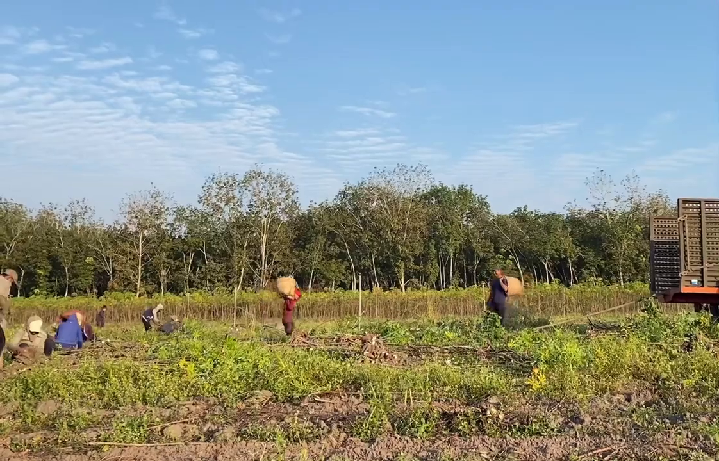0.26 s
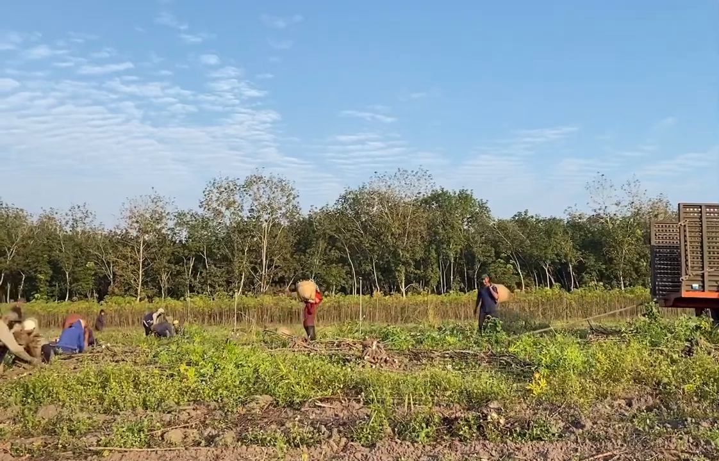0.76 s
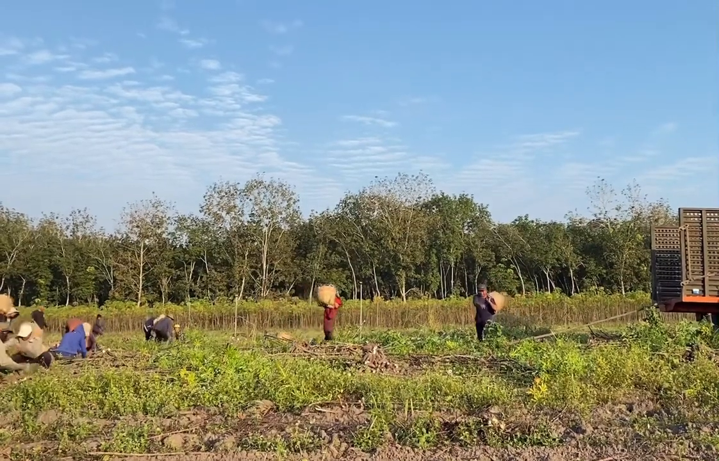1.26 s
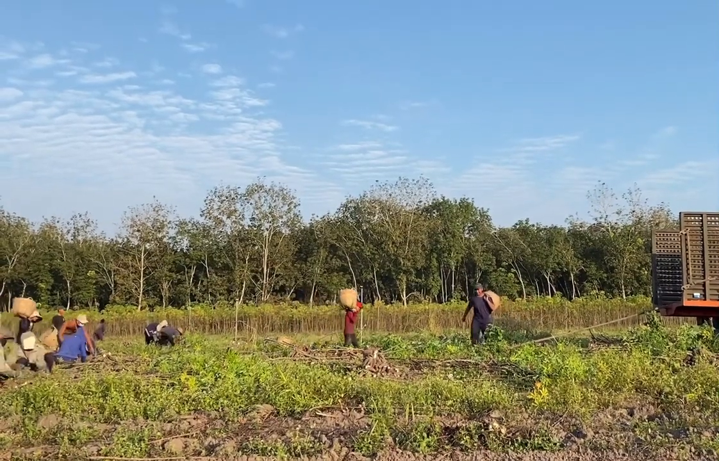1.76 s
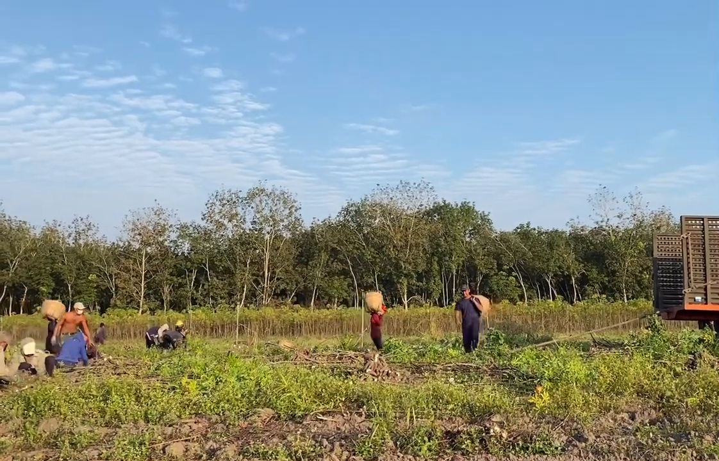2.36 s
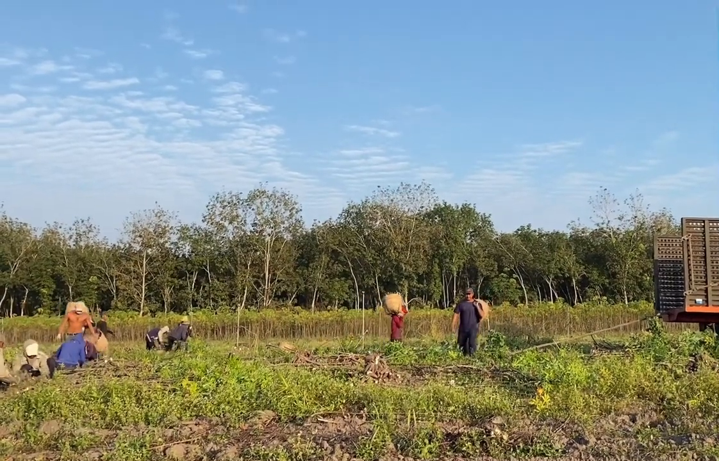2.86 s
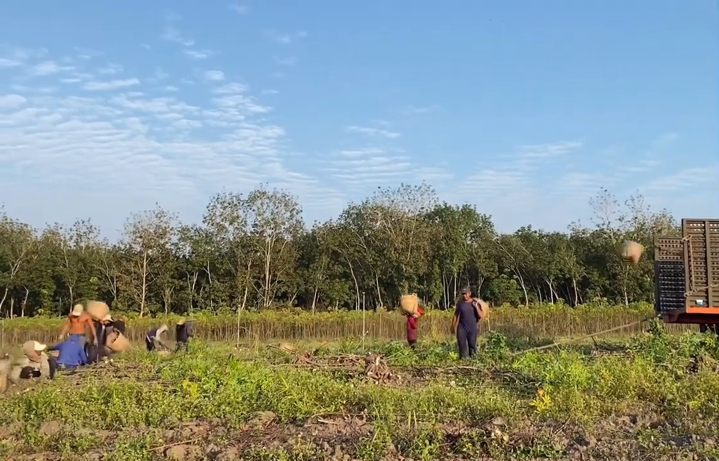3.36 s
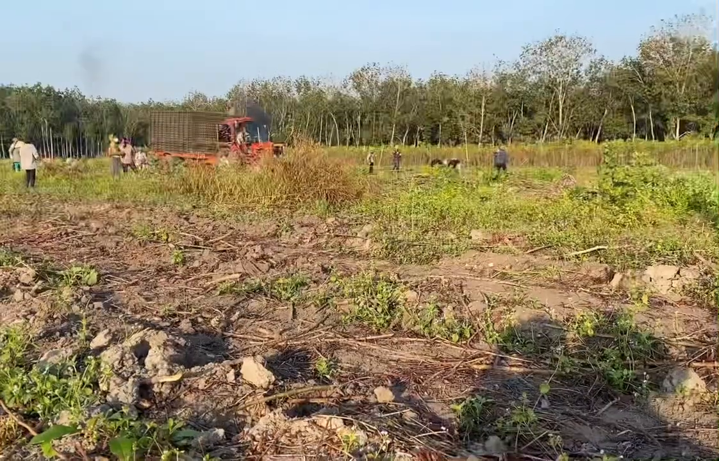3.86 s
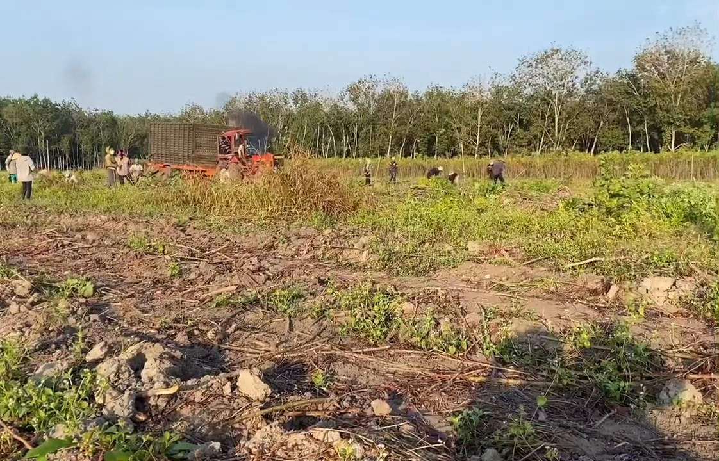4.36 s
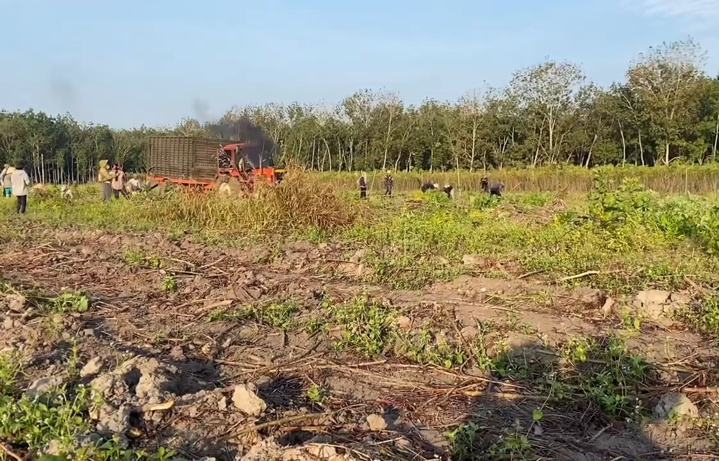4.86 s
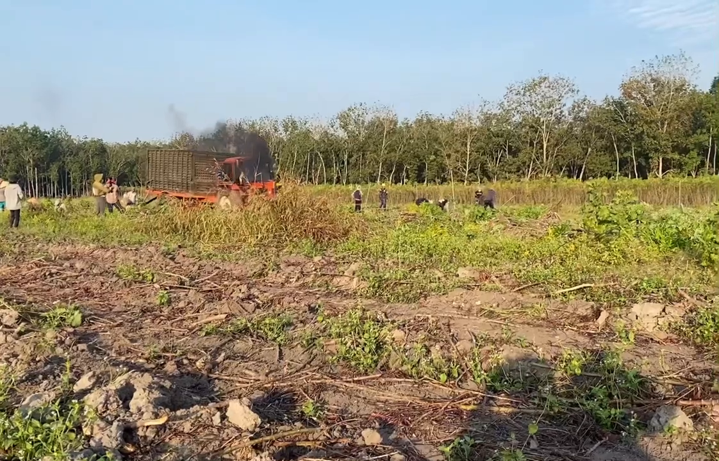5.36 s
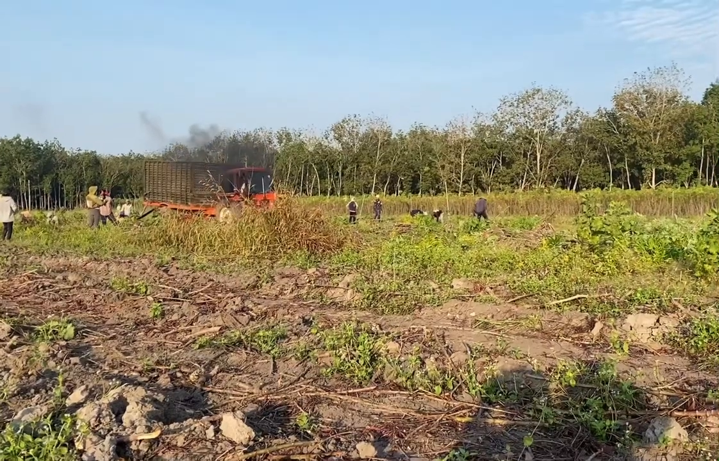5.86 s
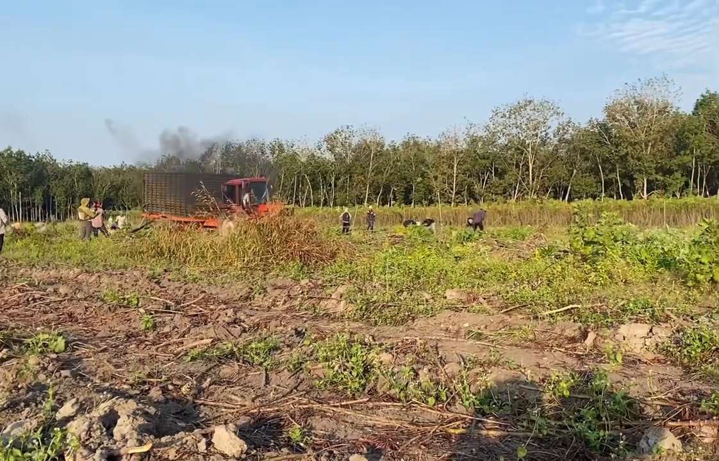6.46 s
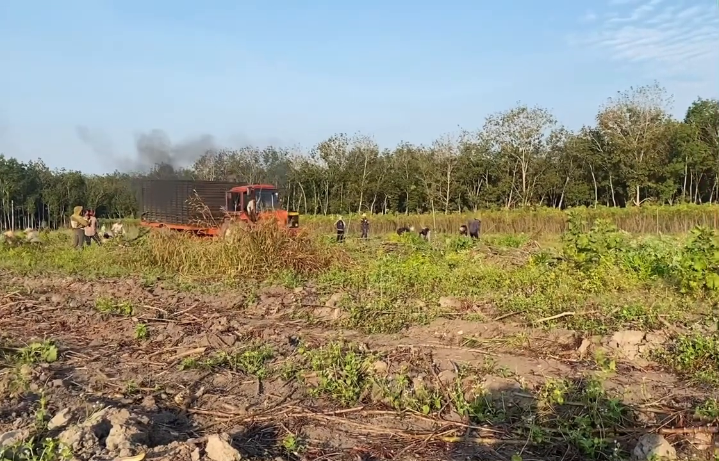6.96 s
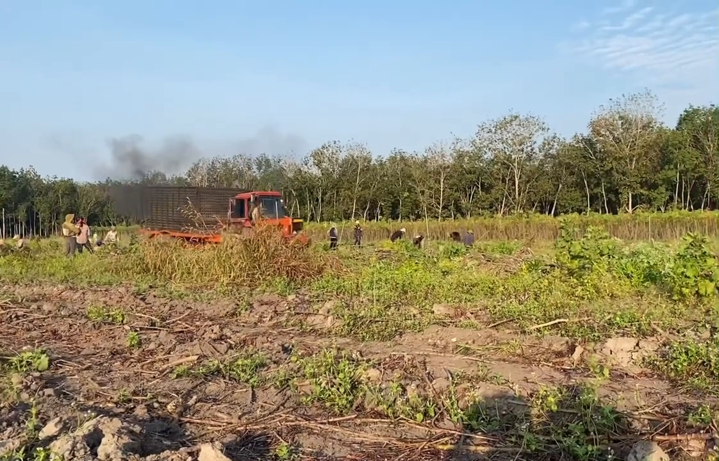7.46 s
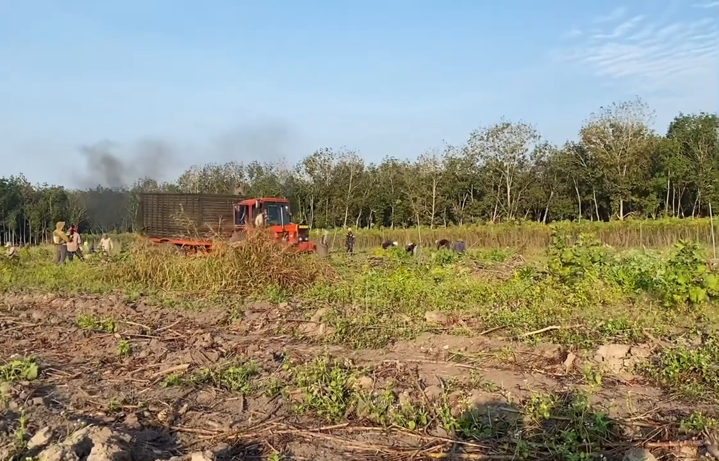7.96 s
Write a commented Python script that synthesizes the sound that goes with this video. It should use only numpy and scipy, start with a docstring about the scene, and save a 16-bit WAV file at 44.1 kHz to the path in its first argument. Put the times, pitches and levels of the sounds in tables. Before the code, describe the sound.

Soft, steady diesel idle in an open field, a brief gap, then slow heavy barks accelerate into a rasping full-load engine roar.

```python
"""A lumpy diesel idle is heard first, with soft clatter and insects, off to one side of a field; after a
short break the same four-cylinder tractor, from another spot, revs up and pulls a loaded trailer.
Impulses at each firing pass through a pipe filter as thumps, and shape noise and decaying rings into the
knock and rasp of the block. A narrow noisy tone is the turbocharger's whistle, climbing as it swells and
then fades. Two microphones hear most layers with a level and phase difference set by frequency."""
import sys
import numpy as np
from scipy import signal
from scipy.fft import rfft, irfft, next_fast_len
from scipy.io import wavfile
from scipy.ndimage import uniform_filter1d

SR = 44100
rng = np.random.default_rng(int(sys.argv[2]) if len(sys.argv) > 2 else 0)


def generate_wav(signal):
    """Clip the signal to [-1, 1] and save it as 16-bit WAV at the path in sys.argv[1]."""
    frames = np.transpose(np.atleast_2d(signal))
    scaled = np.clip(frames, -1, 1) * 32767
    pcm = np.round(scaled).astype(np.int16)
    wavfile.write(sys.argv[1], SR, pcm)


N = 361179
TIME = np.arange(N) / SR  # s
EDGE_HZ = 15500  # upper band limit

# Engine speed under load. Each row: time in seconds, firings per second.
PULL_SPEED = [(3.6, 25.81), (3.92, 26.62), (4.61, 35.35), (5.33, 46.62), (6.1, 62.24), (6.42, 67.72),
              (7.58, 78.64), (8.2, 81.64)]
# Opening of the second spot after the break. Each row: time in seconds, gain.
PULL_FADE = [(3.61, 0.0057), (3.66, 0.41), (3.73, 1)]


def pulling():
    """The engine gathers speed: separate barks merge into a roar while a whistle climbs, swells and fades."""
    rate = curves(PULL_SPEED)[0]
    exhaust_db, knock_db, rasp_db, hiss_db = loudness(rate)
    at, cylinder = firings(rate * (TIME >= PULL_SPEED[0][0]), start_turn=.504)
    speed = (rate - rate.min()) / np.ptp(rate)  # 0 at the slowest, 1 flat out
    _, slow_db, fast_db, _ = np.array(PULL_CYLINDERS)[cylinder].T
    hit_db = slow_db + speed[at] * (fast_db - slow_db)
    engine = pull_exhaust(at, cylinder, rate, speed, exhaust_db)
    engine += at_level(pull_knock(at, cylinder, hit_db, speed), knock_db)
    rasp, puffs = pull_rasp(at, cylinder, hit_db, speed)
    engine += at_level(band(rasp, 1930, 6630), rasp_db)
    engine += at_level(band(rasp, 7070, 16200), hiss_db)
    engine += turbo(puffs) + hum(rate, PULL_HUM)
    engine += ringing(at, hit_db, scatter_db=3.0) + chuffs(at, speed)
    return engine * curves(PULL_FADE)[0]


# Growth of each layer with engine speed. Each holds: level in dB at top speed, dB per octave of speed.
KNOCK_LAW = (-22.5, 7.95)
RASP_LAW = (-33, 7.56)
HISS_LAW = (-44, 3)
# Treble swells and dips. Each row: middle in seconds, half width in seconds (to 1/e), change in dB.
SWELLS = [(4.112, 0.12, 6), (4.72, 0.11, 4), (5.06, 0.15, 7.5), (5.498, 0.088, 2), (5.72, 0.088, 8.5),
          (6.35, 0.071, 8.5), (6.51, 0.24, -7.5), (6.93, 0.14, 5), (8.151, 0.18, 3.5)]
RASP_SWELL_SHARE, KNOCK_SWELL_SHARE = 0.61, 0.23  # how far the lower bands follow
EXHAUST_DB, EXHAUST_DB_PER_OCTAVE, FULL_LOAD_HZ = -16, 13, 42.3  # grows up to this firing rate
BOOM_DB, BOOM_HZ, BOOM_WIDTH_HZ = 4, 58.2, 7.8  # where the beat passes the pipe resonance


def loudness(rate):
    """The exhaust grows to full load and booms at the pipe resonance; knock, rasp and hiss follow speed."""
    exhaust_db = EXHAUST_DB + EXHAUST_DB_PER_OCTAVE * np.minimum(np.log2(rate / FULL_LOAD_HZ), 0)
    exhaust_db += BOOM_DB * bell(rate, BOOM_HZ, BOOM_WIDTH_HZ)
    octaves = np.log2(rate / rate.max())
    knock_db, rasp_db, hiss_db = (db + slope * octaves for db, slope in (KNOCK_LAW, RASP_LAW, HISS_LAW))
    swell_db = sum(db * bell(TIME, s, width) for s, width, db in SWELLS)
    knock_db = knock_db + KNOCK_SWELL_SHARE * swell_db
    rasp_db = rasp_db + RASP_SWELL_SHARE * swell_db
    return exhaust_db, knock_db, rasp_db, hiss_db + swell_db


# The cylinders under load, in firing order. Each row: relative thump in dB, relative knock in dB when
# slow, relative knock in dB flat out, lag in seconds; thump and lag differences are scaled with speed.
PULL_CYLINDERS = [(0.6, 0, 1, .0101), (-0.5, -2.5, -2, .0101), (-1.5, .8, -4.2, .0109),
                  (0.6, 1.3, 1.8, .0106)]
# Exhaust pipe and silencer under load. Each row: frequency in Hz, relative gain in dB.
PULL_PIPE = [(12, -82), (26, -36), (37, -29), (53, -6.5), (71, -1), (80, 2), (106, 5.5), (128, -1),
             (142, -2), (159, -5.5), (180, -14), (205, -12.5), (240, -19), (310, -24.5), (450, -21),
             (900, -46.5)]
SLOW_BASS = 1.4  # extra gain of the deepest part of the puffs at the slowest speed
CRANK_DB = -45  # rms of the crank throb at top speed


def pull_exhaust(at, cylinder, rate, speed, db):
    """One puff a firing through the pipe, over a throb at each turn of the crank (every second firing)."""
    thump_db, _, _, lag_s = np.array(PULL_CYLINDERS)[cylinder].T
    uneven = 0.18 + 0.72 * speed[at] ** 3  # the cylinders differ more at speed
    stumble_db = 2.1 * (1 - speed[at]) ** 3 * rng.standard_normal(len(at))  # the slow engine is unsteady
    lag_s = lag_s.mean() + uneven * (lag_s - lag_s.mean())
    strength_db = uneven * thump_db + stumble_db
    thumps = blows(at, strength_db, scatter_db=0.5, jitter_s=0.000099, delay_s=lag_s)
    pipe = colour(blowdown(thumps, rate, open_share=0.25, longest_s=.0075), PULL_PIPE)
    pipe += SLOW_BASS * (1 - speed) ** 4 * band(pipe, lo_hz=35, hi_hz=80.4)
    crank = np.sqrt(2) * np.sin(np.pi * np.cumsum(rate) / SR)
    throb = gain_of(CRANK_DB) * speed ** 2 * crank
    return at_level(microphones(pipe, [(50, -1.1, 0.14), (200, -0.8, 0.1)]), db) + throb


def blowdown(train, rate, open_share, longest_s):
    """The exhaust valve stays open for a share of each firing, up to a limit: slow puffs are long and deep."""
    out = np.zeros(N)
    for i in np.flatnonzero(train):
        puff = np.hanning(min(open_share / rate[i], longest_s) * SR)
        add(out, (i - len(puff) / 2) / SR, train[i] * puff / puff.sum())
    return out


# Left and right microphones at the second spot. Each row: frequency in Hz, left minus right in dB,
# left lead in radians.
PULL_MICS = [(200, -5, 0.11), (600, 2, 0.23), (1050, 5, 0.33), (1470, 2, 2.25), (1740, 33.5, 2.4),
             (2048, 0.3, 2.45), (2603, 9.5, 7.2), (2740, -0.5, 10.7), (3420, 5, 13.57), (3450, -4.5, 13.56),
             (4310, 5.5, 14.97), (4260, 2, 15.5), (4500, 18, 17), (5900, 3.5, 18.36), (7840, 0, 17.29),
             (10720, 0, 11.26), (14700, 0.2, 5.8)]
GROWL = 0.59  # gain of the bare firing pulses at full speed
BRIGHTEN = 0.81  # extra gain of the top of the knock at full speed


def pull_knock(at, cylinder, hit_db, speed):
    """Each firing knocks on the block, then a piston slaps; slow knocks waver, fast ones growl and brighten."""
    force_db = hit_db * (.8 + .2 * speed[at])
    force_db = force_db + 1.8 * (1 - speed[at]) ** 2 * rng.uniform(-1, 1, len(at))
    hits = blows(at, force_db, scatter_db=.8, jitter_s=.00012, delay_s=.0002)
    slaps = (1 - speed) * blows(at, force_db - 8, scatter_db=2, jitter_s=.0007, delay_s=.0065)
    envelope = bursts(hits + slaps, rise_s=.001, decay_s=.0062)
    knock = evened(rattle(envelope, steady=.25 + .35 * speed ** 2, grain_db=2.9))
    knock += (.65 + .25 * speed) * block_ring(at, cylinder, force_db, rise_s=.0002, decay_s=.0066)
    knock = engine_colour(recolour(knock, at, spread_db=3), speed)
    growl = band(colour(evened(hits), PULL_TONE), 230, 665)
    knock += speed * GROWL * growl - (0.18 + 0.33 * speed) * band(knock, 155, 410)
    knock += BRIGHTEN * speed ** 4 * band(knock, 1440, 2500)
    return band(microphones(knock, PULL_MICS) + trees(knock), 138, 2360)


RASP_BRIGHTEN = 0.4  # extra gain of the middle of the rasp at full speed


def pull_rasp(at, cylinder, hit_db, speed):
    """Ringing treble puffs, each with a weaker second clack, turn into a rush; gives rasp and puffs."""
    clacks = blows(at, hit_db / 2, scatter_db=1.2, jitter_s=.0006, delay_s=-.001)
    clacks += blows(at, hit_db / 2 - 9, scatter_db=2.5, jitter_s=.002, delay_s=.013)
    puffs = uniform_filter1d(bursts(clacks, rise_s=0.008, decay_s=0.0042), size=200)
    rasp = rattle(puffs, steady=0.1 + 3.6 * speed ** 3, grain_db=6)
    rasp += (0.68 + 0.13 * speed) * block_ring(at, cylinder, hit_db / 2, rise_s=0.003, decay_s=0.0094)
    rasp = engine_colour(recolour(rasp, at, spread_db=3.5), speed)
    rasp += RASP_BRIGHTEN * speed ** 6 * band(rasp, 3500, 4300)
    return microphones(rasp, PULL_MICS) + gain_of(-2.5) * trees(rasp), puffs


def block_ring(at, cylinder, hit_db, rise_s, decay_s):
    """Each cylinder rings the block with its own decaying noise, the same at every firing but for strength."""
    t, out = np.arange(SR // 20) / SR, np.zeros(N)
    shape = (1 - np.exp(-t / rise_s)) * np.exp(-t / decay_s)
    for k in range(len(PULL_CYLINDERS)):
        mine = cylinder == k
        own = blows(at[mine], hit_db[mine], scatter_db=1.3, jitter_s=.00007, delay_s=.0002)
        ring = shape * rng.standard_normal(len(t))
        for i in np.flatnonzero(own):
            add(out, i / SR, own[i] * ring)
    return evened(out)


def recolour(x, at, spread_db, count=7):
    """Every firing favours different bands, so no two knocks have the same colour."""
    size = next_fast_len(N)
    log_hz = np.log(np.fft.rfftfreq(size, 1 / SR) + 1)
    place = np.interp(log_hz, np.log(np.geomspace(450, 11000, count)), np.arange(count))
    firing, spectrum = np.searchsorted(at, np.arange(N)), rfft(x, size)
    gains = gain_of(spread_db * rng.uniform(-1, 1, (len(at) + 1, count)))
    out = np.zeros(N)
    for k in range(count):
        slice_k = irfft(spectrum * np.maximum(1 - abs(place - k), 0), size)[:N]
        out += slice_k * uniform_filter1d(gains[firing, k], 64)
    return out


# Clatter colour at the second spot, slow then flat out. Each row: frequency in Hz, relative gain in dB.
SLOW_TONE = [(200, -2.5), (290, -1), (400, -20), (510, -5.5), (620, -18.5), (770, -4), (860, -15),
             (1000, -8.5), (1250, -2.5), (1530, -13.5), (1850, -8.5), (2100, -7), (2400, -6), (2720, -10.5),
             (3020, -7.5), (4000, -10.5), (5200, -11.5), (5600, -5.5), (6200, -9), (7400, -21),
             (11000, -22.5), (15000, -52.5)]
PULL_TONE = [(200, 2), (310, -2.5), (370, -6.5), (470, -4.5), (610, -13.5), (770, -2.5), (860, -8.5),
             (970, -5), (1220, -2.5), (1400, -4), (1530, -21.5), (1700, -13), (2000, -5.5), (2150, -13),
             (2450, -16.5), (2720, -18), (3000, -18.5), (3250, -16), (3550, -15), (4400, -18),
             (5200, -16.5), (5750, -17), (7200, -28), (11000, -38.5), (12200, -46), (14000, -43.5),
             (15000, -61)]


def engine_colour(x, speed):
    """The narrow ringing bands of the slow engine give way to the fast engine's colour."""
    return colour(x * (1 - speed), SLOW_TONE) + colour(x * speed, PULL_TONE)


TREES_DB, TREES_DECAY_S = -7, 0.044


def trees(x):
    """A short diffuse echo from the edge of the field, different at each microphone."""
    t = np.arange(SR // 4) / SR
    tails = rng.standard_normal((2, len(t))) * np.exp(-t / TREES_DECAY_S)
    echo = signal.oaconvolve(x[None], tails / np.linalg.norm(tails), axes=1)[:, :N]
    return gain_of(TREES_DB) * echo


# Turbocharger spooling up. Each row: time in seconds, pitch in Hz, relative level in dB.
TURBO = [(3.6, 7700, -56), (3.9, 8100, -48), (4.2, 9000, -48), (4.5, 9730, -46), (4.8, 10900, -41),
         (5.0, 11700, -42), (5.2, 13000, -58), (5.45, 14500, -75)]


def turbo(puffs):
    """A breathy whistle that climbs, swelling and then fading, pushed by each puff of the rasp."""
    hz, db = curves(TURBO)
    push = .5 + .5 * puffs
    whistle = gain_of(db) * (TIME < TURBO[-1][0]) * push * whine(hz, width_hz=200)
    return microphones(whistle, PULL_MICS)


# Clean engine orders, under load then at idle. Each row: multiple of the firing rate, rms in dB at the
# top speed of that spot, before the spot's own fade.
PULL_HUM = [(.75, -35.5), (1.5, -36), (1.75, -33.5), (2.75, -34), (3, -36.5), (3.25, -37), (3.75, -38.5),
            (4.25, -39.5), (5.25, -43), (5.75, -42), (6, -62), (6.25, -45)]
IDLE_HUM = [(1.5, -58), (1.75, -47), (2.75, -65), (3.5, -58), (3.75, -46)]
HUM_DB_PER_OCTAVE = 15.5


def hum(rate, orders):
    """Clean lines at quarter multiples of the firing rate, mostly between its harmonics, louder with speed."""
    turns = np.cumsum(rate) / SR
    lines = np.zeros(N)
    for k, db in orders:
        multiple = round(4 * k) / 4  # whole quarters of the firing rate
        lines += gain_of(db) * np.sin(2 * np.pi * (multiple * turns + rng.random()))
    return np.sqrt(2) * lines * gain_of(HUM_DB_PER_OCTAVE * np.log2(rate / rate.max()))


# Ringing metal panels. Each row: frequency in Hz, relative level in dB, time to fall 60 dB in seconds.
PANEL_MODES = [(936, -29.5, 0.047), (1854, -37, 0.043), (2446, -37, 0.049), (2884, -34, 0.042),
               (3044, -32.5, 0.041), (3450, -39, 0.05)]


def ringing(at, force_db, scatter_db):
    """Every firing strikes the metal panels, each mode with its own chance strength."""
    t, out = np.arange(SR // 10) / SR, np.zeros(N)
    for hz, db, t60 in PANEL_MODES:
        hits = blows(at, force_db + db, scatter_db=scatter_db, jitter_s=.0003, delay_s=.0005)
        out += signal.oaconvolve(hits, gain_of(-60 * t / t60) * np.sin(2 * np.pi * hz * t))[:N]
    return microphones(out, PULL_MICS) + trees(out)


# relative level, then middle and half width (to 1/e) as shares of a firing
CHUFF_DB, CHUFF_AT, CHUFF_WIDTH = -35.5, 0.28, 0.4


def chuffs(at, speed):
    """A high hiss swells early in each slow firing, sinks before the next, and fades out with speed."""
    turns = np.interp(np.arange(N), at, np.arange(len(at))) % 1
    gate = bell(turns, CHUFF_AT, CHUFF_WIDTH) * (1 - speed) ** 5
    hiss = band(rng.standard_normal(N), lo_hz=4940, hi_hz=6300)
    return microphones(gain_of(CHUFF_DB) * gate * evened(hiss), PULL_MICS)


# Extra hard knocks under load. Each row: time in seconds, peak in dB before the microphones.
BANGS = [(4.001, -18), (4.169, -27), (4.236, -23), (4.604, -10.5), (4.741, -23), (4.819, -15.5),
         (5.478, -12), (5.6, -8.5), (5.694, -6.5), (5.729, -5), (6.057, -9), (6.369, -16), (6.601, -24),
         (6.997, -8), (7.105, -17), (7.16, -8), (7.264, -17), (7.278, -12), (7.369, -7.5), (7.474, -9.5),
         (7.525, -25), (7.577, -8), (7.98, -15)]
# Colour of the hard knocks. Each row: frequency in Hz, relative gain in dB.
BANG_TONE = [(300, -13), (600, -12), (800, -2), (1000, 4.5), (1300, 7), (1530, -22), (1900, -7.5),
             (3000, -16), (4500, -35), (9000, -45)]
BANG_DECAY_S = .0035


def bangs():
    """Hard knocks: a sharp crack of decaying noise that rings the whole block."""
    t, out = np.arange(SR // 20) / SR, np.zeros(N)
    for s, db in BANGS:
        crack = np.pad(rng.standard_normal(len(t)) * np.exp(-t / BANG_DECAY_S), (64, 0))
        crack = colour(crack, BANG_TONE)
        add(out, s, gain_of(db) * crack / abs(crack).max())
    return microphones(out, PULL_MICS)


# Idle speed. Each row: time in seconds, firings per second.
IDLE_SPEED = [(0, 31.82), (.32, 32.52), (1.33, 33.63), (3.6, 33.95)]
# The cylinders at idle, in firing order. Each row: relative thump in dB, relative knock in dB, relative
# tick in dB, lag through the manifold in seconds.
IDLE_CYLINDERS = [(-9.5, 7, 2, 0.0091), (-8, 4.5, -17, 0.00883), (-8, 6, -15, 0.0095),
                  (-9.5, 7, 7, 0.00703)]
# Exhaust pipe and silencer at idle. Each row: frequency in Hz, relative gain in dB.
IDLE_PIPE = [(20, -74), (35, -21), (52, 6), (68, -2), (100, -1.5), (130, -1), (150, -13.5), (200, -21),
             (300, -23.5), (600, -76)]
# Clatter colour at the first spot. Each row: frequency in Hz, relative gain in dB.
IDLE_TONE = [(60, 10), (200, -7), (380, -5), (520, -15), (640, -9), (950, -8.5), (1200, -5), (1600, -9),
             (1850, -12.5), (2060, -11.5), (2250, -20), (2500, -16.5), (2950, -18.5), (3200, -17.5),
             (3700, -26), (3950, -17), (4300, -18), (4550, -19.5), (4900, -19.5), (6200, -32.5),
             (6700, -36), (7400, -29), (11000, -33), (15000, -39)]
# Left and right microphones at the first spot. Each row: frequency in Hz, left minus right in dB,
# left lead in radians.
IDLE_MICS = [(194, -2, -1), (715, -1.5, 1.3), (1014, 1.5, -2.5), (1160, -30, -1.5), (1530, 10, 1.5),
             (1680, -2.5, -3.5), (2240, 2, 1.4), (2580, 1, -1), (2870, 4, 1.9), (3400, -2, 0.05),
             (4500, -4, 1.5), (5400, 0, 3), (8460, 1, -2.5), (14200, -1, 5)]
# A narrow ringing tone at idle. Each row: time in seconds, pitch in Hz.
IDLE_WHINE = [(0, 4440), (.7, 4470), (1.5, 4520), (3.6, 4600)]
# Gain of the whole first spot, its first value held from the start. Each row: time in seconds, gain.
IDLE_FADE = [(3.46, 0.37), (3.53, 0.17), (3.575, 0.0052)]
IDLE_EXHAUST_DB, IDLE_CLATTER_DB = -23.5, -37.5  # before that gain


def idling():
    """A lumpy exhaust beat with soft diesel clatter and a faint whine, steady until the break."""
    rate = curves(IDLE_SPEED)[0]
    at, cylinder = firings(rate, start_turn=.115)
    thump_db, hit_db, tick_db, lag_s = np.array(IDLE_CYLINDERS)[cylinder].T
    thumps = blows(at, thump_db, scatter_db=1.5, jitter_s=0.0004, delay_s=lag_s)
    shake = gain_of(-7) * evened(colour(rng.standard_normal(N), IDLE_PIPE))  # rough noise in the pipe
    exhaust = evened(colour(thumps, IDLE_PIPE)) + shake
    exhaust = microphones(exhaust, [(50, -0.5, -0.16), (200, -3.0, -0.26)])
    knocks = blows(at, hit_db, scatter_db=1.7, jitter_s=.0008, delay_s=-.0038)
    envelope = bursts(knocks, rise_s=.008, decay_s=.0055)
    clatter = colour(rattle(envelope, steady=1.0, grain_db=3.5), IDLE_TONE)
    clatter = microphones(clatter, IDLE_MICS)
    # the diffuse part off the trees: separate steady noise at each microphone
    scatter = np.array([colour(rng.standard_normal(N), IDLE_TONE) for side in range(2)])
    clatter = evened(clatter) + gain_of(-5.0) * evened(scatter)
    clatter += gain_of(-17) * evened(3 + envelope) * whine(curves(IDLE_WHINE)[0], width_hz=65)
    engine = at_level(exhaust, IDLE_EXHAUST_DB) + at_level(band(clatter, 174, 24000), IDLE_CLATTER_DB)
    engine += hum(rate, IDLE_HUM) + idle_ticks(at, tick_db) + idle_thuds()
    return (engine + insects()) * curves(IDLE_FADE)[0]


# Heavy firings at idle, mostly every second engine cycle. Each row: time in seconds, relative thump in
# dB, relative knock in dB.
IDLE_THUDS = [(0.055, -13, -23), (.311, -24, -20), (0.554, -17, -20), (0.797, -16.5, -18),
              (1.039, -22, -24), (1.277, -20, -22), (1.507, -24, -39), (1.753, -19, -22), (2.462, -42, -26),
              (2.702, -19, -29)]
THUD_HZ, THUD_S = 100, 0.027


def idle_thuds():
    """Now and then a firing lands harder: a noisy knock, then a deep sine puff."""
    t, out = np.arange(0, THUD_S, 1 / SR), np.zeros(N)
    puff = np.hanning(len(t)) * np.sin(2 * np.pi * THUD_HZ * t)
    for s, db, _ in IDLE_THUDS:
        add(out, s + 0.0055, gain_of(db) * puff)
    knocks = snaps([(s, db) for s, _, db in IDLE_THUDS], decay_s=0.0049, lo_hz=550, hi_hz=1650)
    return out + microphones(knocks, IDLE_MICS)


IDLE_TICK_DB = -50  # before the microphones and the gain of the first spot


def idle_ticks(at, tick_db):
    """A sharp metallic tick of banded noise just ahead of each firing, loudest from the last cylinder."""
    ticks = blows(at, tick_db, scatter_db=1.5, jitter_s=.0003, delay_s=-.003)
    strokes = bursts(ticks, rise_s=.0006, decay_s=.005)
    tick = band(strokes * rng.standard_normal(N), lo_hz=2470, hi_hz=3350)
    return gain_of(IDLE_TICK_DB) * microphones(evened(tick), IDLE_MICS)


# Dull rumbles as the engine picks up. Each row: start in seconds, length in seconds, level in dB at
# the top of the swell.
RUMBLES = [(4.164, .14, -26), (4.54, .12, -29), (4.763, 0.16, -25)]


def rumble(start_s, length_s, db):
    """A brief swell of low noise as the engine picks up."""
    swell = np.sin(np.pi * np.clip((TIME - start_s) / length_s, 0, 1))
    return gain_of(db) * swell * evened(band(rng.standard_normal(N), 46, 160))


# Small dry crackles. Each row: time in seconds, peak in dB before the microphones.
CRACKLES = [(5.2251, -34), (5.3114, -17), (5.3341, -18.5), (5.5182, -17), (5.6712, -32), (5.711, -30)]


def crackles():
    """Short, dry bursts of bright noise."""
    return microphones(snaps(CRACKLES, decay_s=.004, lo_hz=3500, hi_hz=10000), PULL_MICS)


# Insects in the field. Each row: start in seconds (negative: already singing), end in seconds, pitch
# in Hz, noise bandwidth to each side in Hz, relative level in dB.
INSECTS = [(-2, 1.6, 6600, 170, -58), (-1, 3.6, 6600, 170, -57), (-5, 3.6, 5500, 170, -52)]


def insects():
    """Thin, steady buzzing from fuzzy tones, one of which stops partway through the idle."""
    out = np.zeros((2, N))
    for start, end, hz, width_hz, db in INSECTS:
        singing = uniform_filter1d(1. * (TIME >= start) * (TIME < end), 2000)
        buzz = np.array([whine(np.full(N, hz), width_hz) for side in range(2)])
        out += gain_of(db) * singing * buzz
    return out


def whine(hz, width_hz):
    """A sine that follows a pitch curve, made fuzzy by low-passed noise."""
    low_pass = signal.butter(2, width_hz, fs=SR, output='sos')
    fuzz = evened(signal.sosfilt(low_pass, rng.standard_normal(N)))
    return fuzz * np.sin(2 * np.pi * np.cumsum(hz) / SR) * (hz < EDGE_HZ)


def snaps(rows, decay_s, lo_hz, hi_hz):
    """Short single bursts of decaying noise within a band."""
    t, out = np.arange(SR // 20) / SR, np.zeros(N)
    for s, db in rows:
        burst = np.pad(rng.standard_normal(len(t)) * np.exp(-t / decay_s), (64, 0))
        burst = band(burst, lo_hz, hi_hz)
        add(out, s, gain_of(db) * burst / abs(burst).max())
    return out


def firings(rate, start_turn):
    """The sample at which each firing falls, and its cylinder."""
    count = np.floor(start_turn + np.cumsum(rate) / SR).astype(int)
    at = np.flatnonzero(np.diff(count)) + 1
    return at, count[at] % len(PULL_CYLINDERS)


def blows(at, db, scatter_db, jitter_s, delay_s):
    """One impulse a firing, never quite alike in strength or timing."""
    size, slip = rng.uniform(-np.sqrt(3), np.sqrt(3), (len(at), 2)).T
    train = np.zeros(N)
    late = ((delay_s + jitter_s * slip) * SR).astype(int)
    train[np.clip(at + late, 0, N - 1)] = gain_of(db + scatter_db * size)
    return train


def bursts(train, rise_s, decay_s):
    """The envelope of the rattle that follows each blow."""
    t = np.arange(SR // 12) / SR
    shape = (1 - np.exp(-t / rise_s)) * np.exp(-t / decay_s)
    return evened(signal.oaconvolve(train, shape)[:N])


def rattle(envelope, steady, grain_db):
    """Grainy noise under an envelope, like dense tiny impacts, over a steady rush."""
    flicker = np.tanh(evened(uniform_filter1d(rng.standard_normal(N), 60)))
    grain = gain_of(grain_db * flicker)
    return grain * envelope * rng.standard_normal(N) + steady * rng.standard_normal(N)


def microphones(x, mics):
    """Splits one sound into left and right, with a level and phase difference at each frequency."""
    size = next_fast_len(N + 4096)
    tilt_db, lead = read(mics, np.fft.rfftfreq(size, 1 / SR))
    ratio = gain_of(tilt_db)
    pair = np.array([ratio, np.exp(-1j * lead)]) / np.sqrt(1 + ratio ** 2)
    return irfft(rfft(x, size) * pair, size)[:, :N]


def colour(x, points, size=8192):
    """Causal minimum-phase filter with the given spectrum: it rings after each blow."""
    log_gain = np.log(gain_of(read(points, abs(np.fft.fftfreq(size, 1 / SR)))[0]))
    ring = np.fft.ifft(np.exp(np.conj(signal.hilbert(log_gain)))).real[:size // 2]
    return signal.oaconvolve(x, ring)[:N]


def band(x, lo_hz, hi_hz):
    """Steep band-pass without delay."""
    sos = signal.butter(4, [lo_hz, min(hi_hz, .49 * SR)], 'band', fs=SR, output='sos')
    return signal.sosfiltfilt(sos, x)


def at_level(pair, db, size=6000):
    """Brings the slow level of a stereo sound onto a dB curve."""
    power = uniform_filter1d(uniform_filter1d(pair.mean(0) ** 2, size), size)
    return pair * gain_of(db) / np.sqrt(abs(power) + 1e-20)


def gain_of(db):
    """Decibels to gain."""
    return 10 ** (np.asarray(db) / 20)


def evened(x):
    """Scales to rms 1."""
    return x / np.sqrt(np.mean(x ** 2) + 1e-20)


def bell(x, middle, half_width):
    """A smooth hump of height 1."""
    return np.exp(-((x - middle) / half_width) ** 2)


def curves(rows):
    """Each column of a timed table, sample by sample."""
    s, *columns = np.transpose(rows)
    return [np.interp(TIME, s, c) for c in columns]


def read(points, hz):
    """Each column of a frequency table, on a log axis."""
    f, *columns = np.transpose(points)
    return [np.interp(np.log(hz + 1), np.log(f), c) for c in columns]


def add(mix, s, sound):
    """Mixes a sound in at time s."""
    part = mix[round(s * SR):][:len(sound)]
    part += sound[:len(part)]


def scene():
    """Idle among insects, then the pull with its hard knocks, a few crackles and rumbles."""
    rumbles = sum(rumble(*row) for row in RUMBLES)
    return idling() + pulling() + bangs() + crackles() + rumbles


def record(dry):
    """The band limit of the recorder: a steep low-pass."""
    low_pass = signal.firwin(511, EDGE_HZ, window=("kaiser", 9), fs=SR)
    return signal.oaconvolve(dry, low_pass[None], "same")


dry = scene()
out = record(dry)
generate_wav(out)
```